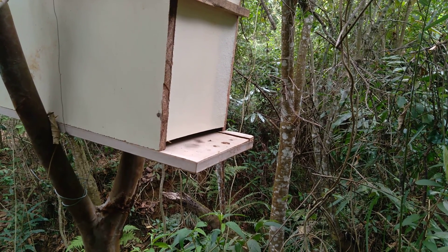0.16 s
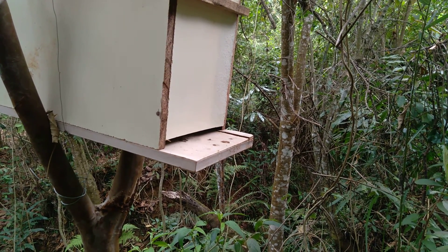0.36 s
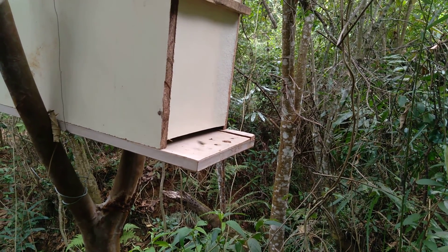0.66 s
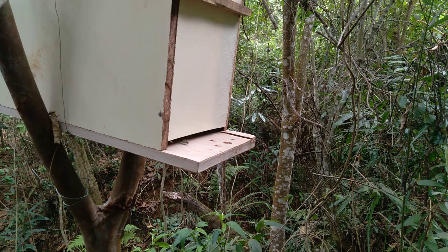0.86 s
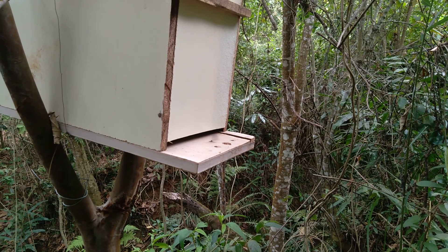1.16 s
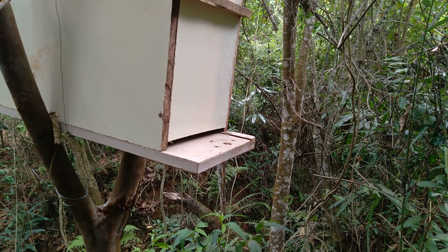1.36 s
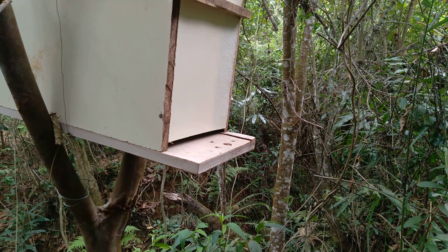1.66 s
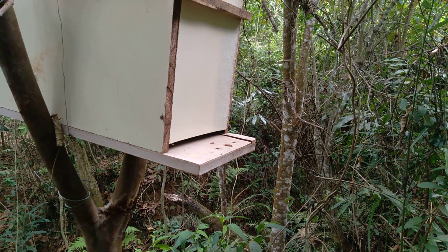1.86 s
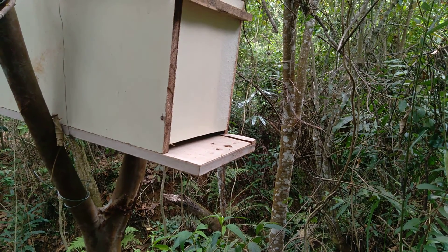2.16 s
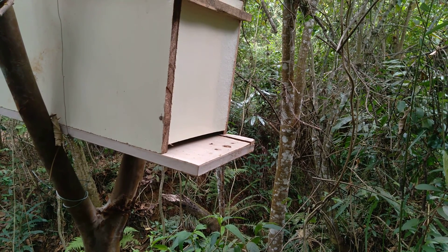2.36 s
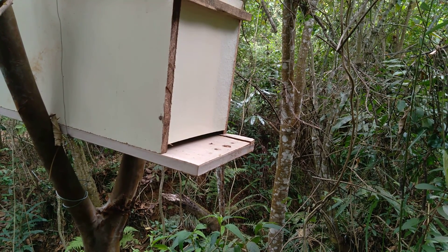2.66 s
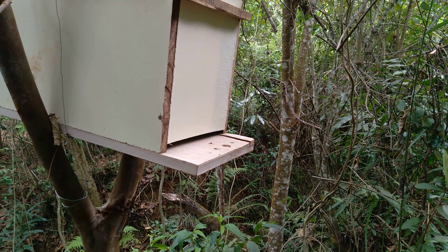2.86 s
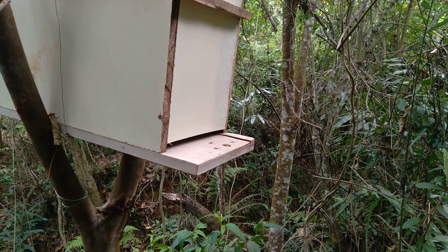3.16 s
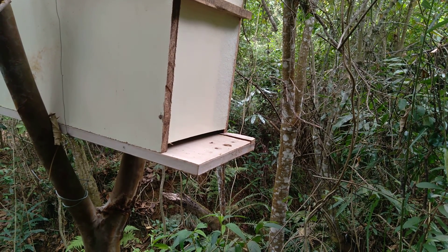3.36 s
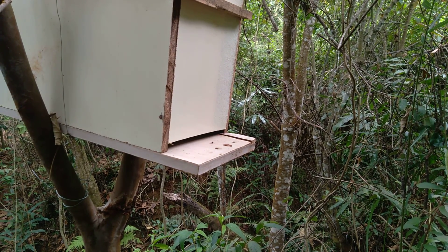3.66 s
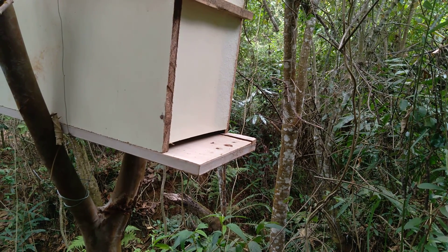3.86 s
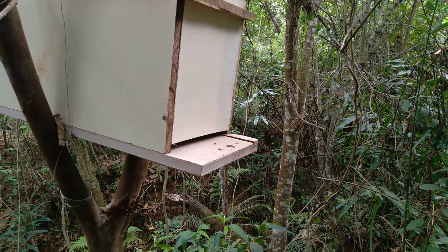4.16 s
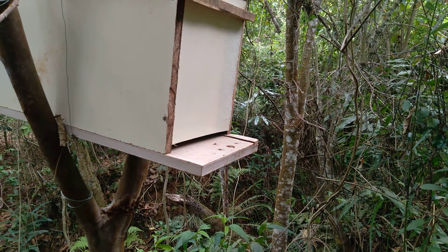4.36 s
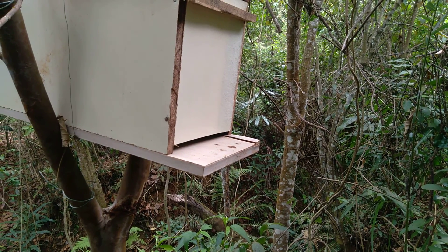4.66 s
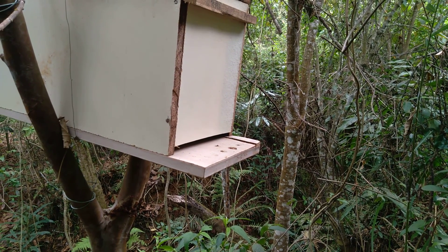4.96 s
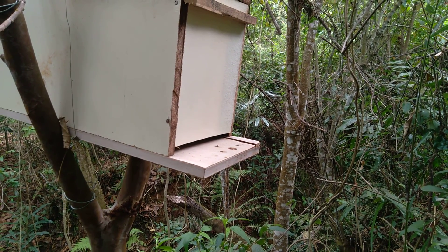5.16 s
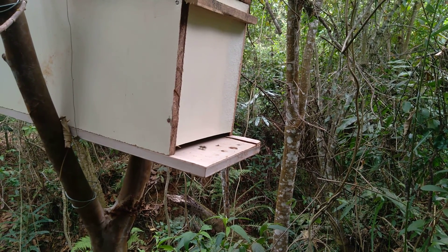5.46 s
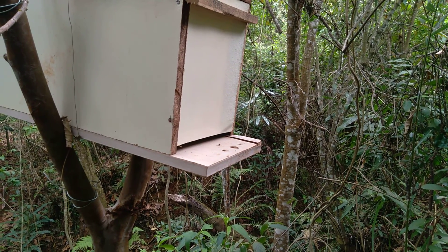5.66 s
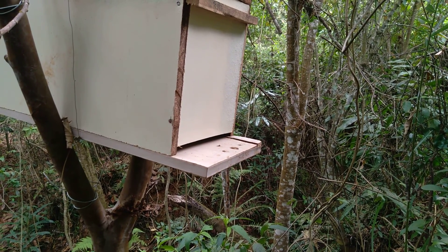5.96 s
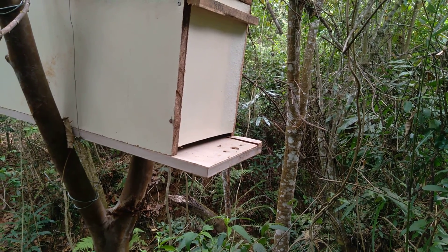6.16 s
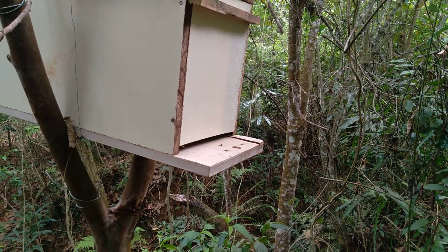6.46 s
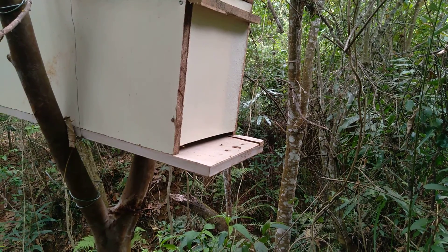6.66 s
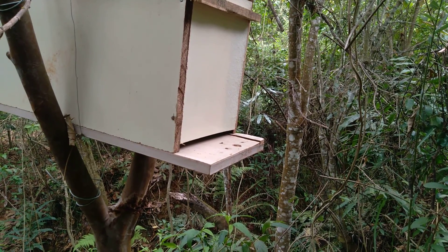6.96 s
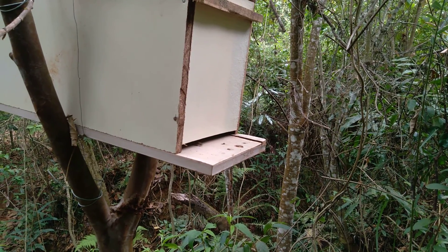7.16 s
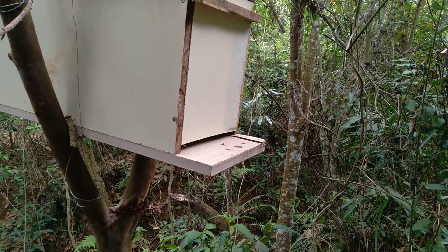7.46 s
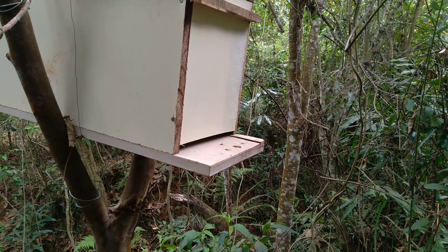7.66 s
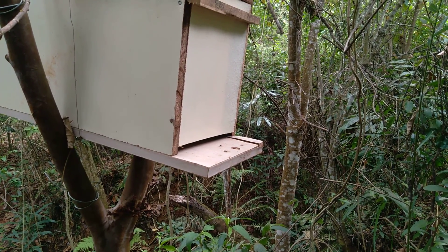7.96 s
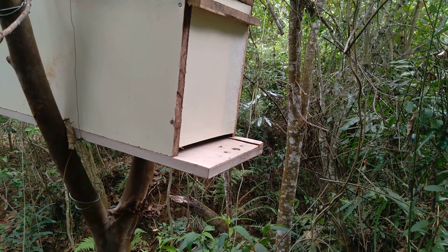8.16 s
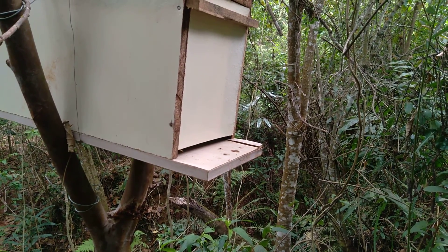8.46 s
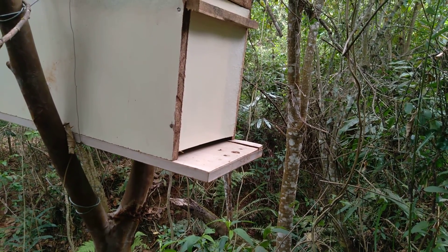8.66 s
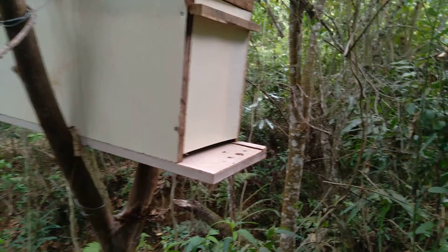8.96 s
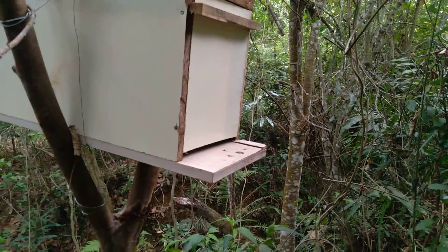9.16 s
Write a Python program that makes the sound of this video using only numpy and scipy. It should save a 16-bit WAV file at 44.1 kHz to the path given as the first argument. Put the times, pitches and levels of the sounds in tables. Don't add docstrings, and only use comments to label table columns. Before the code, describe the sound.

A loud, steady cicada drone shrills in dense woodland, with throbbing neighbours, rasping swells, low wind rumble and small ticks of twigs.

```python
import sys
import numpy as np
from scipy import signal
from scipy.io import wavfile
from scipy.ndimage import uniform_filter1d

SR = 44100
rng = np.random.default_rng(int(sys.argv[2]) if len(sys.argv) > 2 else 0)


def ratio(d):
    e = np.asarray(d, float) / 20
    return 10 ** e


def unload_wav(signal):
    wavfile.write(
        sys.argv[1],
        SR,
        np.round(np.clip(np.atleast_2d(signal).T, -1, 1) * 32767).astype(np.int16),
    )


N = 411453
T_S = np.arange(N) / SR
WINDOW, HOP = 1024, 256


def rms_one(x):
    return x / np.sqrt(np.mean(x ** 2) + 1e-20)


def in_time(rows, closed=False):
    s, *columns = np.transpose(rows)
    edge = -150 if closed else None
    return [np.interp(T_S, s, c, edge, edge) for c in columns]


def drift(rate):
    r = np.exp(-80 * np.pi * rate / SR)
    slow = signal.lfilter([1], [1, -2 * r, r * r], rng.standard_normal(N // 40 + 2002))[2000:]
    return np.interp(np.arange(N) / 40, np.arange(len(slow)), rms_one(slow))


def body(modes, hz):
    return np.sqrt(sum(ratio(2 * db) * np.exp(-((hz - centre_hz) / width_hz) ** 2)
                       for centre_hz, width_hz, db in modes))


def shape(x, gain):
    hz, s, frames = signal.stft(x, SR, nperseg=WINDOW, noverlap=WINDOW - HOP)
    at = np.minimum((s * SR).astype(int), N - 1)
    return signal.istft(frames * gain(hz[:, None] + 1, at), SR, nperseg=WINDOW, noverlap=WINDOW - HOP)[1][:N]


def patches(depth_db, bins, frames):
    def gain(hz, at):
        field = rng.standard_normal((len(hz), len(at)))
        for turn in range(2):
            field = uniform_filter1d(field, size=bins, axis=0)
            field = uniform_filter1d(field, size=frames, axis=1)
        return ratio(depth_db * rms_one(field))
    return gain


def coloured(points, patchy_db):
    hz_points, db_points = np.transpose(points)
    blotch = patches(patchy_db, bins=3, frames=9)

    def gain(hz, at):
        return blotch(hz, at) * ratio(np.interp(np.log(hz), np.log(hz_points), db_points))
    return rms_one(shape(rng.standard_normal(N), gain))


def beating(beat, effort, power, strengths_db=(0,)):
    (pulses,), (top_db, dip_db, *_) = in_time(beat), in_time(effort)
    top_db = top_db + np.interp(pulses, np.arange(len(strengths_db)), strengths_db)
    uneven = np.clip(1 + .15 * drift(1.65), 0, 2)
    return top_db, -dip_db * np.abs(np.sin(np.pi * pulses)) ** power * uneven


# t/s, share of fading
UNREST = [(0, 1.1), (2.5, 1), (5.5, .7), (7.5, .4), (9.33, .4)]
# f/Hz, share
DIP_SHARE = [(3500, 2.9), (3800, 1.75), (4300, 1), (4550, 0.93), (4800, 0.49), (5050, .8), (5300, 0.23),
             (6500, 0.92)]


def singer(clicks_per_s, modes, alternate, fading_db, wobble, tilt_db_per_khz=0, dip_db=0):
    phase = 2 * np.pi * np.cumsum(clicks_per_s) / SR + 0.036 * drift(13.0)
    orders = np.arange(12, 33) + alternate / 2
    pitches_hz = orders * np.mean(clicks_per_s)
    khz_off = np.clip(pitches_hz - 4390, -700, 700) / 1000
    start = 7 * wobble * (rng.random(len(orders)) - .5)
    unrest, = in_time(UNREST)
    shares = np.interp(pitches_hz, *np.transpose(DIP_SHARE))
    total = np.zeros(N)
    for k, gain, p, off, share in zip(orders, body(modes, pitches_hz), start, khz_off, shares):
        if gain > .01:
            level_db = fading_db * unrest * drift(2.72) + tilt_db_per_khz * off + dip_db * share
            total += gain * ratio(level_db) * np.cos(k * phase + wobble * drift(9.1) + p)
    return rms_one(total)


# t/s, swells so far
DRONE_BEAT = [(-.14, 0), (.64, 2), (1.43, 4), (1.82, 5), (2.16, 6), (3.77, 10), (4.13, 11), (6.57, 17),
              (7.63, 20), (9.36, 25)]
# t/s, top level/dB, dip/dB, tilt/(dB per kHz)
DRONE_EFFORT = [(0, -35, 2.5, 2.5), (.4, -33.5, 4.5, -0.5), (.85, -35, 1, 0), (1.4, -34.5, 3, 0.5),
                (2.2, -33.5, 4.5, 3.5), (3, -33, 4.5, 4.5), (4, -33.5, 1, 3), (4.901, -33.5, 2, 3),
                (5.8, -32.5, 1, 3), (6.6, -32, 1, 3), (7.3, -31.5, 1.5, 4), (7.7, -33.5, 1, 3.5),
                (8, -34.5, 2.5, 6), (8.5, -33, 3.5, 7.5), (8.8, -31, 1.5, 3.5), (9.33, -33, -1, 6)]
DRONE_SWELL_DB = [0, 1, -1, 0, 0, 1, -1, 1, 0, 0, 0, 0, 0, 0, 0, 0, 0, 0, 0, 0, 0, 0, 0, 0, 0, 0]


def drone_effort():
    return beating(DRONE_BEAT, DRONE_EFFORT, power=1.9, strengths_db=DRONE_SWELL_DB)


# t/s, rate/(clicks per s)
DRONE_RATE = [(0, 252.3), (2.3, 252.05), (4.2, 251.85), (5.3, 252.3), (6.3, 251.9), (7.4, 251.6),
              (8.2, 251.15), (9.33, 250.8)]
# f/Hz, width/Hz, level/dB
DRONE_BODY = [(3528, 40, -10.5), (3780, 60, -1.5), (4520, 382, 2.5), (5140, 300, -4.5), (5842, 200, -40.5),
              (6447, 119, -3.5), (7034, 110, -12), (7823, 86, -4)]


def drone(top_db, dip_db):
    rate, tilt = in_time(DRONE_RATE)[0], in_time(DRONE_EFFORT)[2]
    song = singer(rate, DRONE_BODY, alternate=False, fading_db=1.2, wobble=.25,
                  tilt_db_per_khz=tilt, dip_db=dip_db)
    return ratio(top_db + 6.0) * song


# rate/(clicks per s), level/dB
NEIGHBOURS = [(262.4, 0), (264.6, -4), (288.0, -1), (285.4, -6)]
# t/s, far blur level/dB, neighbours level/dB
CHORUS = [(0, -8, -2), (1, -15, -0.5), (2, -22.5, -2), (3, -13.5, -3), (4, -4.5, -2.5), (5, -10, -0.5),
          (6, -7.5, -2.5), (7.3, -6.5, -3), (7.8, -3.5, 3), (8.5, -9.5, 0.5), (8.9, -2.5, -3),
          (9.33, -3, 1.5)]
# f/Hz, width/Hz, level/dB
CROWD_BODY = [(4010, 180, -9), (4633, 362, 4.5), (4903, 88, 1.5), (5550, 180, -2), (6574, 270, -7),
              (8173, 126, -6)]
# f/Hz, width/Hz, level/dB
BLUR_BODY = [(4044, 160, 3.5), (4570, 670, -11), (5140, 350, 0.5)]


def crowd(top_db, dip_db):
    blur_db, neighbour_db = in_time(CHORUS)
    steady = sum(ratio(db) * singer(np.full(N, rate), CROWD_BODY, alternate=True, fading_db=1.4, wobble=1.17)
                 for rate, db in NEIGHBOURS[:2])
    flicker = patches(.4, bins=9, frames=21)
    blur = rms_one(shape(rng.standard_normal(N), lambda hz, at: flicker(hz, at) * body(BLUR_BODY, hz)))
    mix = ratio(top_db + 0.28 * dip_db + 3.5) * (ratio(neighbour_db) * steady + ratio(blur_db) * blur)
    blotch, (unrest,) = patches(3, bins=5, frames=15), in_time(UNREST)
    return shape(mix, lambda hz, at: blotch(hz, at) ** (unrest[at] ** 2 / 2))


# t/s, rate/(clicks per s)
THROB_RATE = [(0, 289.8), (3.5, 290.0), (4.8, 290.45), (6.1, 290.4), (9.33, 290.5)]


def pulsing(modes, level_db, smear_db):
    lead = singer(in_time(THROB_RATE)[0], modes, alternate=True, fading_db=1.1, wobble=0.55)
    in_step = sum(ratio(db) * singer(np.full(N, rate), modes, alternate=True, fading_db=1.4, wobble=0.95)
                  for rate, db in NEIGHBOURS[2:])
    flicker = patches(1.1, bins=7, frames=15)
    smear = rms_one(shape(rng.standard_normal(N), lambda hz, at: flicker(hz, at) * body(modes, hz)))
    level_db = level_db + .4 * (level_db - uniform_filter1d(level_db, size=SR // 3))
    return ratio(level_db) * rms_one(lead + in_step + ratio(smear_db) * smear)


# f/Hz, width/Hz, level/dB
BELLY = [(3836, 90, -4), (3933, 305, -1.5), (4081, 158, 4), (5016, 220, -2), (5810, 140, -10)]
# t/s, pulses so far
BELLY_BEAT = [(.04, 0), (1.05, 5), (1.89, 9), (3.41, 16), (3.69, 17), (4.61, 21), (5.41, 25), (6.2, 29),
              (7.62, 36), (9.33, 44)]
# t/s, top level/dB, dip/dB
BELLY_EFFORT = [(0, -40.5, 8), (1.001, -40.5, 5.5), (1.9, -36.5, 8), (2.5, -39, 1.5), (3.2, -38.5, 3.5),
                (4.2, -39, 2.5), (5.4, -36.5, 0.5), (6.3, -40.5, 1), (7, -42, -1), (7.701, -40, 0.5),
                (8.4, -40, -0.5), (9.33, -43.5, -1)]
BELLY_PULSE_DB = [-5.5, -1.5, 1.5, 2.5, 1.5, 2, 0.5, 0, 0, -2, -0.5, 1.5, 0, 1.5, 0, -0.5, 2, 1, 1.5, 3, 2,
                  2, 0.5, 0.5, -1, 1.5, -1, 1, 1.5, 4]
# f/Hz, width/Hz, level/dB
TYMBAL = [(6440, 240, -4), (7500, 450, 3), (7910, 53, 7.5), (8317, 21.3, -5), (8670, 120, -12)]
# t/s, pulses so far
TYMBAL_BEAT = [(.03, 0), (1.88, 9), (2.56, 12), (2.74, 13), (3.42, 16), (3.56, 17), (4.63, 22), (6.21, 30),
               (7.26, 35), (9.33, 45)]
# t/s, top level/dB, dip/dB
TYMBAL_EFFORT = [(0, -41, 8.5), (0.901, -38.5, 0.76), (1.9, -41, 12), (2.301, -39.5, 1.4), (3, -41, 5.7),
                 (3.6, -40.5, 1.6), (4.2, -40, 6.3), (5, -39, 2.5), (6.2, -38, 1.55), (6.799, -37.5, 1.1),
                 (7.3, -38, 0.56), (8.4, -37.5, 0.35), (9.33, -37, 0.45)]


def throbbing():
    belly_db = sum(beating(BELLY_BEAT, BELLY_EFFORT, power=2.2, strengths_db=BELLY_PULSE_DB))
    tymbal_db = sum(beating(TYMBAL_BEAT, TYMBAL_EFFORT, power=1.9))
    return pulsing(BELLY, belly_db + 6.5, smear_db=1) + pulsing(TYMBAL, tymbal_db + 7, smear_db=-10)


# t/s, level/dB
WIND = [(0.0, -55.5), (0.23, -55), (0.6, -65), (0.83, -48.5), (1.45, -55.5), (1.58, -50.5), (1.95, -57),
        (2.83, -43.5), (2.93, -50), (3.33, -46), (3.51, -66.5), (4.03, -50), (4.49, -50.5), (5.51, -58),
        (5.74, -53.5), (5.97, -58), (7.53, -46.5), (9.33, -51)]
# t/s, length/s, level/dB
GUSTS = [(0.214, 0.17, -54.5), (0.54, 0.15, -55), (0.742, 0.12, -51), (1.09, 0.12, -58), (1.516, 0.38, -53),
         (1.984, 0.34, -54), (2.466, 0.14, -50), (2.791, 0.22, -42.5), (3.18, 0.36, -57),
         (3.611, 0.12, -56.5), (4.114, 0.35, -47.5), (4.617, 0.2, -59), (5.065, 0.12, -63),
         (5.754, 0.06, -59), (5.975, 0.03, -54.5), (6.812, 0.3, -57.5), (7.23, 0.26, -49),
         (7.704, 0.25, -56), (8.204, 0.3, -51), (8.59, 0.21, -51), (8.908, 0.075, -57), (9.27, 0.2, -59.5)]
# f/Hz, density/(dB per Hz)
RUMBLE = [(20, -75), (36, -40.5), (55, -9), (85, -34), (135, 8.5), (200, -3.5), (280, 2.5), (340, -45)]
# f/Hz, density/(dB per Hz)
GUST = [(230, -39), (300, 4.5), (400, -5.5), (520, -12), (620, -16.5), (720, -76)]


def wind():
    rumble_db, = in_time(WIND)
    gust = ratio(rumble_db - 15.5)
    for s, length_s, db in GUSTS:
        gust = gust + ratio(db) * np.exp(-((T_S - s) / length_s) ** 2 * 2)
    lumps_db = 0.92 * drift(1.9)
    rumble = ratio(rumble_db + lumps_db + 1.87) * coloured(RUMBLE, patchy_db=1.0)
    return rumble + ratio(1.76) * gust * coloured(GUST, patchy_db=3.0)


# f/Hz, density/(dB per Hz)
FLOOR = [(300, -2), (700, -4), (1500, 0.5), (2700, -6), (6000, 0), (8500, 5), (10000, -6), (14000, -14.5)]


def floor():
    return ratio(-47.5) * coloured(FLOOR, patchy_db=0.8)


# t/s, level/dB
BUMPS = [(0.079, -59), (0.131, -53.5), (1.585, -47), (1.625, -54.5), (1.84, -60), (2.386, -55.5),
         (3.761, -58.5), (3.938, -52.5), (4.039, -53), (4.119, -59.5), (4.275, -63.5), (4.537, -55),
         (4.672, -63), (4.761, -52.5), (4.867, -52.5), (5.772, -52), (6.024, -49), (6.071, -46),
         (6.232, -55), (6.293, -55), (6.829, -56), (7.221, -55), (7.704, -54), (7.822, -56), (8.165, -53.5),
         (8.253, -53), (8.352, -58), (8.974, -47), (9.01, -58)]
# t/s, f/Hz, level/dB
TWIGS = [(0.364, 1857, -56), (0.561, 2630, -59), (0.873, 2390, -64), (0.892, 2085, -57), (1.072, 770, -59),
         (1.199, 2040, -55.5), (1.205, 2510, -69), (1.317, 1955, -48.5), (1.319, 2580, -57.5),
         (1.472, 765, -53), (1.619, 1736, -57.5), (1.893, 1493, -57.5), (2.042, 1027, -64.5),
         (2.104, 2440, -60.5), (2.139, 2540, -59.5), (2.173, 2470, -59.5), (3.345, 962, -60.5),
         (3.46, 1397, -53), (3.702, 2450, -60), (3.732, 1576, -57.5), (3.751, 2054, -56.5),
         (3.944, 1900, -53), (3.973, 2430, -59), (3.983, 792, -55), (4.029, 2390, -58),
         (4.033, 1610, -54.5), (4.214, 1620, -56), (4.265, 1120, -66), (4.43, 760, -58.5),
         (4.464, 1733, -57), (4.512, 1954, -56.5), (4.587, 1756, -54.5), (4.662, 1420, -47.5),
         (4.691, 2120, -57), (4.77, 1644, -53), (4.999, 2090, -56.5), (5.08, 1623, -59),
         (5.21, 1804, -43.5), (5.261, 2510, -60), (5.642, 1140, -56), (5.662, 1650, -59),
         (6.279, 2160, -53.5), (6.282, 1780, -61), (6.369, 2340, -69), (6.511, 700, -56),
         (6.572, 2210, -63), (6.69, 1938, -55), (6.709, 2510, -58), (6.897, 2150, -61.5),
         (6.931, 1764, -55), (7.024, 1654, -57.5), (7.025, 2480, -71), (7.214, 1640, -58),
         (7.454, 1034, -63), (8.403, 1716, -54), (8.58, 2040, -54.5), (8.779, 1837, -51.5),
         (8.798, 1000, -58.5), (8.821, 2330, -57.5), (8.967, 2050, -62)]
# t/s, f/Hz, level/dB
FAR_TWIGS = [(0.222, 2540, -69), (0.512, 2570, -67), (0.552, 1910, -61.5), (1.23, 1550, -67.5),
             (1.452, 1700, -61), (1.533, 2080, -62.5), (1.658, 1570, -58), (1.712, 1249, -64),
             (1.852, 2167, -64.5), (2.037, 1375, -59), (2.268, 1650, -61.5), (2.446, 1300, -63),
             (2.633, 3030, -66.5), (2.9, 1030, -71), (2.956, 1770, -61.5), (3.147, 2310, -66),
             (3.363, 1620, -61), (3.509, 2000, -61.5), (3.559, 1990, -62), (3.781, 1657, -60.5),
             (3.876, 1830, -62), (4.2, 2980, -74), (4.234, 1300, -57), (4.25, 2140, -63),
             (4.331, 2455, -68), (4.338, 970, -66), (4.592, 2480, -71), (4.642, 2470, -82),
             (4.834, 2350, -71.5), (5.138, 1910, -62.5), (5.199, 805, -61.5), (5.496, 1540, -64),
             (5.629, 2520, -79), (5.633, 1900, -61.5), (6.342, 1680, -57.5), (6.686, 1320, -65),
             (6.771, 1270, -63.5), (6.862, 1670, -60), (7.141, 2080, -64), (7.211, 2040, -64),
             (7.479, 1269, -61), (7.575, 1530, -63), (7.919, 2045, -67), (7.952, 1290, -62.5),
             (8.032, 2024, -65), (8.038, 1630, -60.5), (8.073, 1970, -62), (8.582, 1550, -63.5),
             (8.662, 2412, -74), (8.952, 786, -64.5)]
# t/s, f/Hz, level/dB
SNAPS = [(1.325, 2060, -56), (1.33, 1740, -53), (5.213, 1567, -58), (5.213, 2010, -55.5),
         (5.258, 1625, -48), (5.258, 2010, -50), (6.28, 2010, -63), (8.402, 1980, -58.5), (9.3, 2470, -63)]
# t/s, f/Hz, level/dB
LEAVES = [(0.441, 13300, -70), (1.471, 8940, -58.5), (1.566, 15100, -56), (2.286, 9600, -53.5),
          (3.457, 12750, -73), (5.021, 12500, -66), (7.221, 10600, -62.5), (7.806, 10200, -62),
          (7.905, 9560, -63.5), (8.072, 8900, -57.5), (8.074, 10150, -57.5), (8.356, 11700, -65),
          (8.605, 11080, -54), (8.62, 8900, -49), (8.812, 11050, -64.5)]


def ticks():
    out, t = np.zeros(N + SR // 4), np.arange(SR // 4) / SR
    faint = rng.random((70, 3)) * [N / SR, .95, 6] + [0, 6.95, -76]
    faint[:, 1] = np.exp(faint[:, 1])
    bumps = [(s, 1286 * (1 + 0.0212 * rng.standard_normal()), db) for s, db in BUMPS]
    rows = np.vstack([bumps, TWIGS, FAR_TWIGS, SNAPS, LEAVES, faint])
    envelope = (1 - np.exp(-t / 0.0012)) * (np.exp(-(t / 0.011) ** 1.5) + 0.3 * np.exp(-t / 0.06))
    lowpass = signal.butter(2, 60, fs=SR, output="sos")
    noise = rng.standard_normal((len(rows), 2, 2 * len(t))) + 0.061
    noise = signal.sosfilt(lowpass, noise)[..., len(t):]
    click = uniform_filter1d(rng.standard_normal(noise.shape), size=30)
    noise = noise + 0.73 * np.exp(-t / 0.0016) * click
    for (s, hz, db), (a, b) in zip(rows, noise):
        puff = envelope * (a * np.cos(2 * np.pi * hz * t) + b * np.sin(2 * np.pi * hz * t))
        puff = puff / np.sqrt(np.sum(puff ** 2) / np.sum(envelope ** 2))
        out[max(round((s - .004) * SR), 0):][:len(t)] += ratio(db + 5.0) * puff
    return out[:N]


# t/s, bursts so far
RASP_BEAT = [(.487, 0), (1.3, 39), (1.867, 66), (2.283, 86), (6.527, 290), (6.985, 312), (9.108, 416),
             (9.33, 427.1)]


def rasp(bursty):
    bursts, = in_time(RASP_BEAT)
    cycle = bursts % 1
    gate = 1 - np.clip(bursty, 0, 1) * (cycle > .62)
    ribs = np.diff(np.floor(6 * bursts + .12 * drift(150)), prepend=0) > 0
    clicks = ribs * rng.uniform(-0.33, 1, N) * ratio(-6.0 * cycle)
    clicks = clicks + 0.7 * (rng.random(N) < 400 / SR) * rng.uniform(-1.26, 1, N)
    return gate * (rms_one(clicks) * 0.4 + rng.standard_normal(N) * 0.7)


def climb(start_s, end_s, start_db, end_db, steepness=1):
    progress = np.clip((T_S - start_s) / (end_s - start_s), 0, 1)
    outside = np.maximum(start_s - T_S, 0) / 0.15 + np.maximum(T_S - end_s, 0) / 0.25
    edges_db = 20 * steepness * outside ** 1.01
    return progress, ratio(start_db + (end_db - start_db) * progress - np.minimum(edges_db, 200))


SWELLS = [
    (0.52, 1.195, -31, -27),
    (0.985, 1.263, -30, -24),
    (1.88, 2.239, -35.5, -26),
    (6.53, 6.976, -29, -27),
    (7.742, 8.13, -32, -24),
    (8.22, 8.738, -28.5, -26.5),
    (8.867, 9.404, -38.5, -23),
]
# low edge f/Hz, high edge at start f/Hz, high edge at end f/Hz
SWELL_EDGES = [(5700, 6250, 9450), (6420, 9600, 9440), (5850, 6300, 7800), (6200, 8320, 8680),
               (5000, 7660, 8800), (5280, 8380, 8600), (5540, 9070, 8430)]
# start t/s, end t/s, start level/dB, end level/dB
OVERTONE = (1.02, 1.25, -55, -49)


def swells():
    rasps = []
    for row, (low_hz, first_hz, last_hz) in zip(SWELLS, SWELL_EDGES):
        progress, level = climb(*row)
        closing_hz = np.clip(4300 * (T_S - row[1]), 0, 1000)
        low = low_hz - 107 * progress
        high = first_hz + (last_hz - first_hz) * progress ** 0.63
        rasps.append((level, low, high - low - closing_hz))
    width_hz = sum(level * wide for level, low, wide in rasps) / sum(level for level, low, wide in rasps)
    source = rasp(0.42 + 1.2 * np.exp(-width_hz / 700))
    blotch = patches(0.3, bins=5, frames=5)

    def band_gain(hz, at):
        power = 0
        for level, low, wide in rasps:
            inside = np.exp(-2 * np.abs(2 * (hz - low[at]) / wide[at] - 1) ** 3.3)
            skirt = ratio(2 * -9) * np.exp(-((hz - low[at]) / 380) ** 2)
            power = power + level[at] ** 2 * (inside + skirt) * SR / wide[at]
        return blotch(hz, at) * np.sqrt(power)
    octave_body = [(14700, 1150, -5.5), (10400, 900, -5.5), (12300, 600, -15)]   # f/Hz, width/Hz, level/dB
    octave = rms_one(shape(source, lambda hz, at: body(octave_body, hz)))
    return ratio(1.5) * shape(source, band_gain) + climb(*OVERTONE, steepness=2.4)[1] * octave


# t/s, level/dB
KNOCKS = [
    (3.946, -46),
    (9.005, -44.5),
]


def knocks():
    out, t = np.zeros(N + SR // 4), np.arange(SR // 4) / SR
    lowpass = signal.butter(1, 2500, fs=SR, output="sos")
    for s, db in KNOCKS:
        crack = signal.sosfilt(lowpass, rng.standard_normal(len(t))) * np.exp(-t / 0.0055)
        thump = ratio(-17.5) * np.sin(2 * np.pi * 70 * t) * np.exp(-t / 0.035)
        out[round(s * SR):][:len(t)] += ratio(db + 10.0) * (crack + thump)
    return out[:N]


# t/s, level/dB
LOW_LINE = [(4.5, -71), (4.71, -66), (6.93, -46), (7.61, -51.5), (7.66, -43), (8.2, -53), (8.6, -55.5),
            (8.9, -53.5), (9.02, -60.5), (9.25, -60), (9.33, -57)]
# t/s, level/dB, f/Hz
CRICKET = [(4.6, -86, 2980), (4.66, -74, 2900), (5.19, -74, 3130), (5.27, -66, 2880), (5.6, -87, 3010),
           (5.68, -69.5, 2960), (6.65, -71.5, 2940), (6.79, -63, 2873), (7.6, -86, 2870), (7.66, -64, 2875),
           (8.14, -68.5, 2910), (8.35, -96, 3000), (8.39, -69.5, 2980), (8.64, -70.5, 2860),
           (8.84, -95, 3100), (9.01, -57, 2905), (9.25, -77, 2970), (9.33, -70, 3040)]


def low_bands():
    blotch = patches(1.0, bins=3, frames=9)
    noise = rng.standard_normal(N)
    upper = shape(noise, lambda hz, at: blotch(hz, at) * body([(3340, 6.2, 0)], hz))
    level_db, pitch_hz = in_time(CRICKET, closed=True)
    lower = shape(noise, lambda hz, at: body([(np.maximum(pitch_hz[at], 2800), 36, 0)], hz))
    upper_db = in_time(LOW_LINE, closed=True)[0] - 2.0
    return ratio(upper_db) * rms_one(upper) + ratio(level_db + 4.5) * rms_one(lower)


# t/s, level/dB
WASH = [(6.2, -60), (7.3, -43), (7.7, -45.5), (8.1, -39.5), (8.4, -40), (8.7, -36.5), (9, -32.5),
        (9.33, -53)]
# f/Hz, width/Hz, level/dB
WASH_BODY = [(4100, 200, -8.5), (4880, 460, -3), (5400, 450, -0.5), (6700, 370, -2)]


def wash():
    noise = rms_one(shape(rng.standard_normal(N), lambda hz, at: body(WASH_BODY, hz)))
    return ratio(in_time(WASH, closed=True)[0] + 1.0) * noise


def scene():
    top_db, dip_db = drone_effort()
    cicadas = drone(top_db, dip_db) + crowd(top_db, dip_db) + throbbing() + swells() + wash()
    mono = cicadas + wind() + floor() + ticks() + knocks() + low_bands()
    return np.array([mono, mono])


def noise_reduction(x, over_db, deepest_db):
    power = np.abs(signal.stft(x, SR, nperseg=WINDOW, noverlap=WINDOW - HOP)[2]) ** 2
    power = uniform_filter1d(uniform_filter1d(power, size=3, axis=0), size=5, axis=1) + 1e-20
    usual = np.exp(uniform_filter1d(np.log(np.percentile(power, 25, axis=1)), size=9))[:, None]
    gain = np.sqrt(np.clip(1 - ratio(2 * over_db) * usual / power, ratio(2 * deepest_db), 1))
    return shape(x, lambda hz, at: gain ** np.clip(hz / 600, .3, 1) * (hz < 15740))


def masking(x):
    hz, _, frames = signal.stft(x, SR, nperseg=WINDOW, noverlap=WINDOW - HOP)
    power = uniform_filter1d(uniform_filter1d(np.abs(frames) ** 2, size=14, axis=0), size=6, axis=1)
    shrill = power[(hz > 6000) & (hz < 8800)].mean(axis=0)
    rows = np.minimum(np.arange(len(hz)) // 14 * 14 + 7, len(hz) - 1)
    columns = np.arange(len(shrill)) // 4 * 4
    faint = (power < ratio(2 * -43) * shrill)[rows][:, columns]
    return shape(x, lambda hz, at: 1 - faint * (hz > 9050) * (hz < 10300))


def top_cut(x):
    return signal.sosfilt(signal.butter(12, 16760, fs=SR, output="sos"), x)


def record(dry):
    mono = noise_reduction(dry[0], over_db=4.0, deepest_db=-15.0)
    rounded = .75 * np.tanh(mono / .75)
    return top_cut(np.tile(masking(rounded), (2, 1)))


dry = scene()
out = record(dry)
unload_wav(out)
```